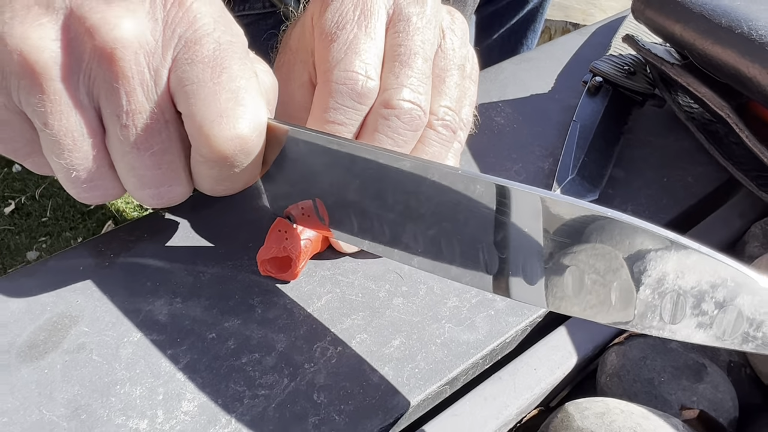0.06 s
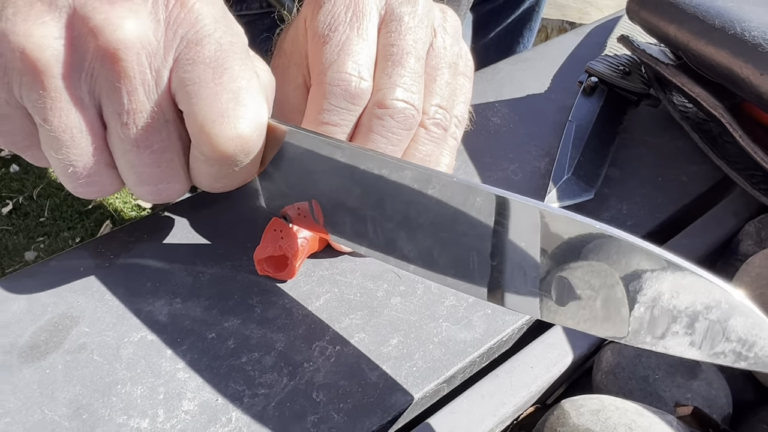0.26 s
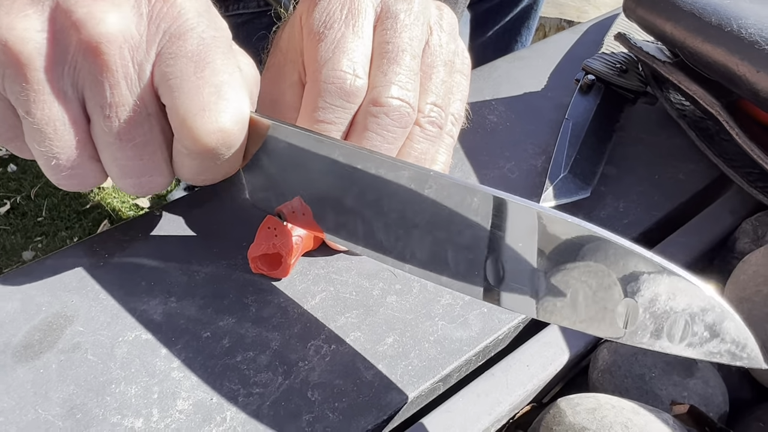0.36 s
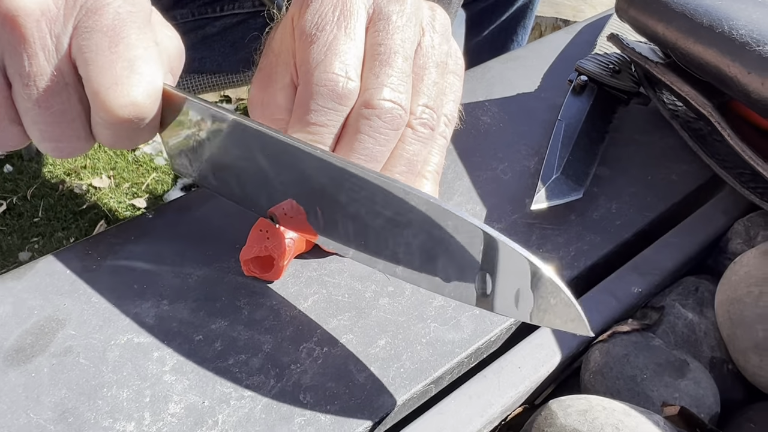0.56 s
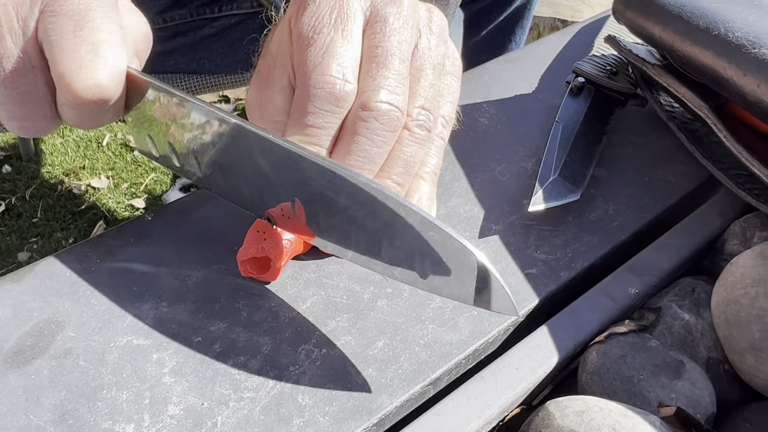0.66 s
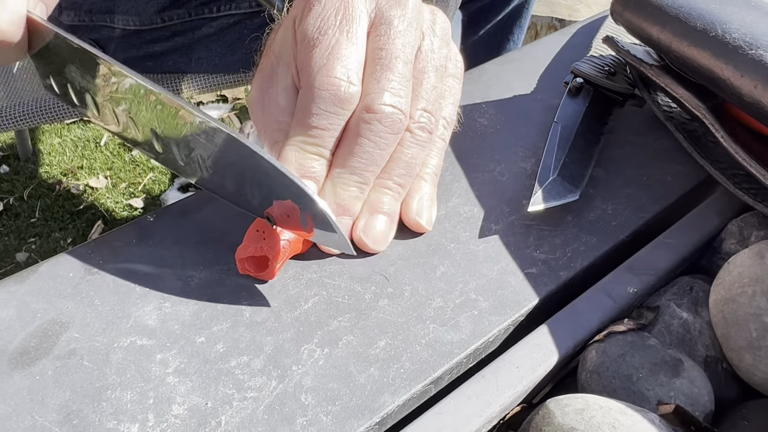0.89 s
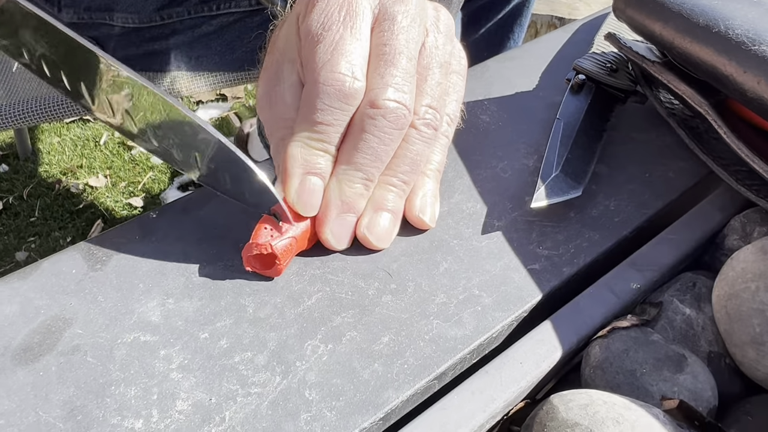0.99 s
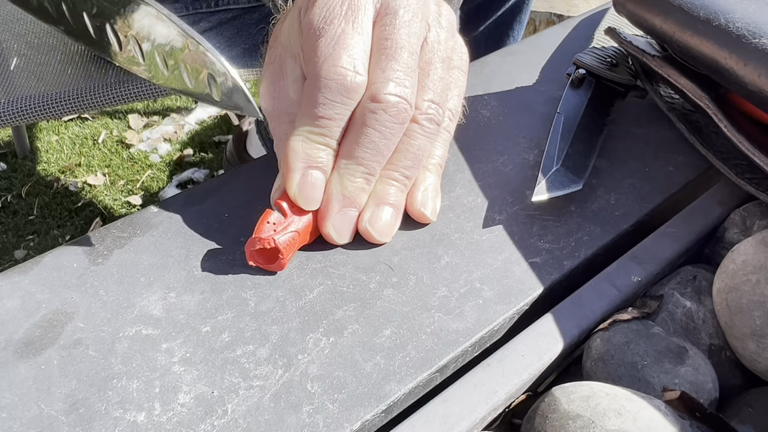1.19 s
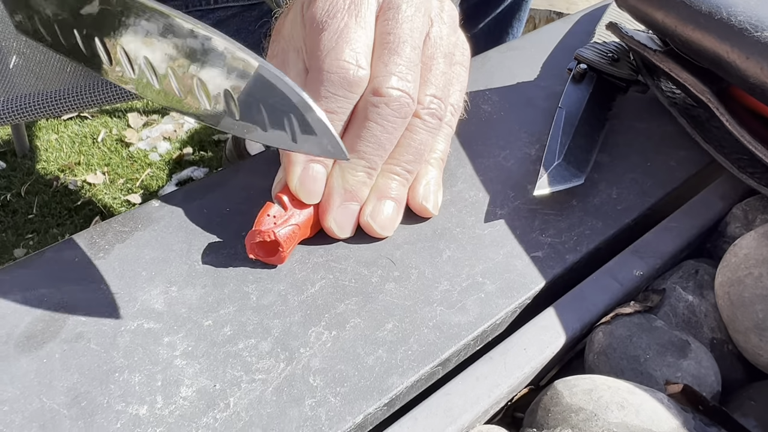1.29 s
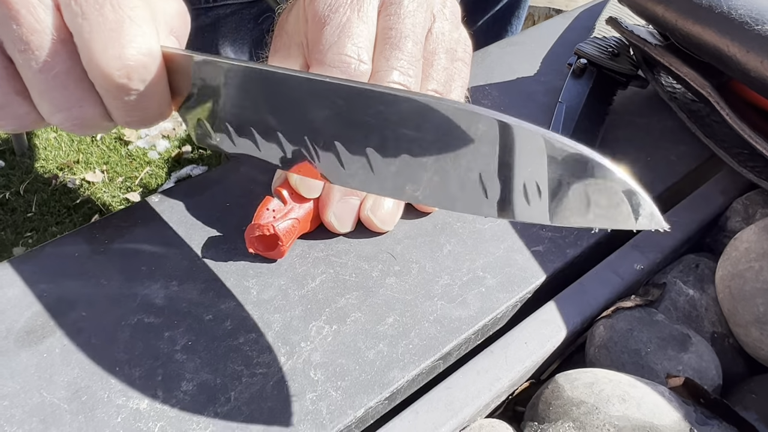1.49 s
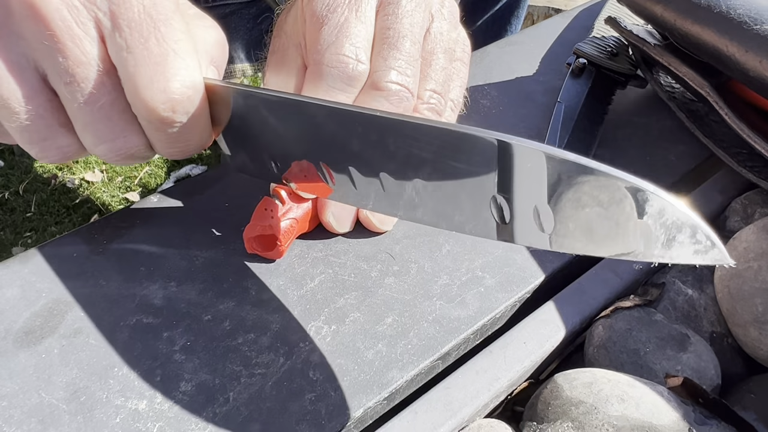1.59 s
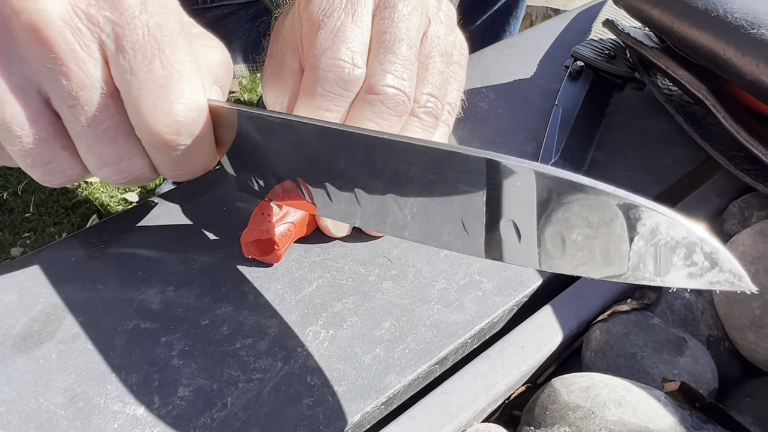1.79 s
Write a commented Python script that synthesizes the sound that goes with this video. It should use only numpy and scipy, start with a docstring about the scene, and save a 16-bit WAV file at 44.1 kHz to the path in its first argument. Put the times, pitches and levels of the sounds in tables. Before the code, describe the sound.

A knife blade rasps once through a small handheld sharpener, gritty and close, outdoors in light wind.

```python
"""Outdoors, at a plastic table: a knife is drawn once through a small carbide sharpener, close to a phone.
Random grit clicks make the rasp and ring the blade; pressure, judder and catches ring table and sharpener.
The tip slips out and rings; the blade is set back into the slot with ticks and faint thin squeaks.
Low-pitched noise buffets the microphone as wind over a faint outdoor hush."""
import sys
import numpy as np
from scipy import signal
from scipy.fft import rfft, irfft, next_fast_len
from scipy.io import wavfile
from scipy.ndimage import uniform_filter1d

SR = 44100
rng = np.random.default_rng(int(sys.argv[2]) if len(sys.argv) > 2 else 0)


def to_wav(sig):
    """Store sig (one row per channel, or 1-D mono) as 16-bit WAV at the path in sys.argv[1].

    Samples outside -1..1 are clipped; the rate is SR.
    """
    pcm = np.clip(np.atleast_2d(sig), -1, 1) * 32767
    pcm = np.round(pcm).astype(np.int16)
    wavfile.write(sys.argv[1], SR, pcm.T)  # frames by channels


def how_loud(loudness_db):
    """Turn decibels into a plain amplitude multiplier (0 dB gives 1, 20 dB gives 10)."""
    steps = np.asarray(loudness_db, float) / 20
    return 10 ** steps


N = 81585
T = np.arange(N) / SR
M = next_fast_len(N + 8192)  # padded FFT length
F = np.arange(M // 2 + 1) * SR / M

# distant noise spectrum: (frequency [Hz], relative level [dB])
HUSH_SPECTRUM = [(150, -56), (250, 0.5), (399, -10), (616, -9.5), (967, -10), (2890, -30), (11200, -36.5),
                 (15800, -38.5)]
# wind noise spectrum: (frequency [Hz], relative level [dB])
WIND_SPECTRUM = [(12, -46), (26, -25), (48, -1.5), (76, 1), (136, -6.5), (236, -15), (505, -39), (700, -80)]
# gusts on the microphone: (time [s], relative level [dB], faster eddies over the rest [dB])
GUSTS = [(0, -52, 3.5), (.105, -29.5, -20), (.2, -42, -9), (.38, -45, 2.5), (.55, -35.5, -3),
         (.592, -37.5, -5), (.628, -33.5, -15), (.66, -48, 13.5), (.85, -28.5, -10.5), (.948, -42, 5),
         (1.0, -27.5, -4), (1.118, -37, -5.5), (1.15, -33.5, -4.5), (1.195, -23.5, 4), (1.25, -32, 2),
         (1.32, -33.5, -9.5), (1.35, -23, -7.5), (1.4, -29, -14), (1.478, -45.5, 4), (1.55, -26, 5),
         (1.612, -47.5, 9.5), (1.7, -44.5, -4), (1.755, -34.5, 1), (1.79, -42, 3)]
# slide and pressure of the edge, which stutters before it runs:
# (time [s], relative rasp level [dB], relative table level [dB])
PULL_COURSE = [(.279, -77, -67.5), (.283, -55, -35), (.29, -52, -32), (.294, -85, -48), (.299, -43, -38),
               (.309, -63, -40), (.314, -45.5, -33), (.328, -61, -53), (.333, -48, -39.5),
               (.36, -50.5, -33), (.385, -41.5, -28.5), (.48, -36.5, -24.5), (.52, -39.5, -27.5),
               (.6, -37.5, -30.5), (.7, -37.5, -24), (.87, -37.5, -33), (.94, -38, -29.5), (1., -43.5, -36),
               (1.03, -45, -41), (1.04, -48, -63), (1.056, -60.5, -53), (1.12, -73, -71)]
# the edge catches and jolts the table: (time [s], relative level [dB])
EDGE_CATCHES = [(0.298, -25), (0.321, -22.5), (0.377, -16), (0.384, -21.5), (0.399, -24), (0.438, -18),
                (0.47, -23), (0.488, -19), (0.532, -13), (0.552, -9), (0.561, -9), (0.623, -22.5),
                (0.648, -23.5), (0.689, -15), (0.773, -21.5), (0.885, -19), (0.913, -11.5), (0.974, -21.5),
                (1.007, -19.5)]
# rasp spectrum: (frequency [Hz], relative level [dB])
RASP_SPECTRUM = [(600, -44), (900, -8.5), (1400, -4), (2500, -12.5), (3700, -11.5), (4500, -19.5),
                 (5400, -18.5), (6300, -23), (7400, -16.5), (9300, -22), (11400, -13), (13300, -20),
                 (14800, -20), (15500, -31)]
# table top modes: (frequency [Hz], relative level [dB], t60 [s])
TABLE_MODES = [(281.4, -13, 0.045), (353, -5.5, 0.074), (440.2, -4, 0.08), (510.3, -1, 0.057),
               (581.5, 2.5, 0.051), (670, 2.5, 0.051), (735.5, -6, 0.039)]
# plastic sharpener body, four modes below 1.5 kHz, then those above:
# (frequency [Hz], relative level [dB], t60 [s])
SHARPENER_MODES = [(905, 5.5, 0.015), (968, 2.5, 0.049), (1142, -3, 0.054), (1430, 2, 0.05),
                   (1826, -0.5, 0.041), (1967, -2.5, 0.042), (2100, -2, 0.022), (2265, -1.5, 0.047),
                   (2660, -4.5, 0.015), (3080, -14, 0.11)]
# blade resting in the slot: (frequency [Hz], relative level [dB], t60 [s])
HELD_BLADE_MODES = [(1480, -5, .06), (2616, -10, .08), (3666, -18, .07), (4355, -22, .08), (4650, -10, .04),
                    (5313, -16, .08), (5830, -6, .11), (6433, -9, .11), (7300, -7, .025), (8740, -6, .045),
                    (11240, 0, .025), (12100, 0, .035), (13510, 2, .03)]
# blade swinging free: (frequency [Hz], relative level [dB], t60 [s])
FREE_BLADE_MODES = [(5609, -4, .5), (6761, -5, .4), (7978, -10, .2), (12160, -1, .3), (12930, 2, .13),
                    (13750, 3, .25)]
# low thuds: (time [s], drive level [dB], frequency [Hz], t60 [s])
LOW_THUDS = [(0.978, -14, 77, 0.11), (1.734, -21, 74.4, 0.044)]
# blade touches the sharpener: (time [s], blade ring drive [dB], crack level [dB], crack top [Hz],
# table and sharpener drive [dB])
BLADE_TAPS = [(1.471, -63, -45, 13000, -85), (1.481, -90, -27, 5460, -52), (1.7076, -33, -30.5, 16200, -36),
              (1.7106, -44, -26.5, 17000, -62)]
# edge brushes the slot with a thin squeak:
# (start [s], length [s], mean level [dB], centre [Hz], width [Hz])
EDGE_BRUSHES = [(1.488, .04, -66, 11500, 200), (1.488, .045, -73, 8700, 300),
                (1.755, .046, -71, 13400, 350), (1.775, .035, -72, 11900, 250),
                (1.786, .014, -65, 5500, 8000)]
# near sound alike at both ports: (frequency [Hz], share [0-1])
PORT_LIKENESS = [(250, 0.7), (550, 0.99), (1200, 0.85), (2200, 0.6), (3900, 0.8), (4600, .4), (6200, .25),
                 (7300, 0.88), (8600, .6)]
# treble of the right side taken from the first port: (frequency [Hz], share [0-1])
ONE_PORT_SHARE = [(8600, 0), (9500, 0.97), (12600, 0.6), (13200, 0.99), (14000, 0.98), (15100, .4)]
# stereo phase: (frequency [Hz], lead of the right side [rad])
RIGHT_LEAD = [(0, 0), (1000, -1), (1300, -2.6), (1800, -2.2), (2200, -4.9), (3600, -4.4), (4100, -6),
              (4800, -6.9), (5900, -8.2), (7000, -6.3), (8300, -5.4), (9500, -3.3), (10500, -3.1),
              (12900, -.1), (13900, 0), (14900, 1.2), (15400, 3.1)]
# stereo balance: (frequency [Hz], left minus right [dB])
BALANCE = [(100, 0), (1800, -0.5), (4100, -1), (5500, 16), (6400, 4.5), (7200, 1.5), (8000, 4.5), (9100, 0)]

NEAR_PORT = np.array([[1], [0]])  # a ring takes one path only


def curve(rows, x, log=False, column=1):
    """Straight lines through one column of a table against its first."""
    a = np.array(rows, float)
    if log:
        return np.interp(np.log(x + 1), np.log(a[:, 0] + 1), a[:, column])
    return np.interp(x, a[:, 0], a[:, column])


def unit(x):
    """Scale to rms 1."""
    return x / np.sqrt(np.mean(x ** 2))


def shape(x, response):
    """Filter by a frequency response."""
    return irfft(rfft(x, M) * response, M)[..., :N]


def colour(x, rows):
    """Filter by a (frequency [Hz], level [dB]) spectrum."""
    return shape(x, how_loud(curve(rows, F, log=True)))


def ring(x, modes):
    """Drive decaying two-pole modes of alternating sign."""
    out = 0
    for k, (hz, db, t60_s) in enumerate(modes):
        r = np.exp(-np.log(1000) / (t60_s * SR))
        w = 2 * np.pi * hz / SR
        mode = signal.lfilter([np.sin(w)], [1, -2 * r * np.cos(w), r * r], x)
        out = out + (-1) ** k * how_loud(db) * mode
    return out


def walk(rate_hz):
    """Random level, new every 1 / rate_hz s, smoothed twice over that time."""
    k = int(SR / rate_hz)
    steps = np.repeat(rng.standard_normal(N // k + 1), k)
    return 1.09 * uniform_filter1d(uniform_filter1d(steps, k), k)[:N]


def burst(start_s, rise_s, fall_s):
    """Envelope with a quick rise and an exponential fall."""
    d = np.maximum(T - start_s, 0)
    return (1 - np.exp(-d / rise_s)) * np.exp(-d / fall_s)


def tick(time_s):
    """One unit impulse."""
    return (np.arange(N) == int(time_s * SR)) * 1.


def hush():
    """Distant outdoor noise, unrelated at the two ports, wavering slightly in level."""
    level_db = -52 + .8 * walk(6)
    return how_loud(level_db) * unit(colour(rng.standard_normal((2, N)), HUSH_SPECTRUM))


def flutter_noise():
    """Wind-coloured noise of fluttering level, rms 1."""
    flutter_db = 4.5 * walk(30.02)
    return unit(colour(rng.standard_normal(N) * how_loud(flutter_db), WIND_SPECTRUM))


def wind():
    """Low buffeting, partly shared by the ports; its faster eddies come and go."""
    alike, eddy_hz, gain_db = 0.58, 103, 1
    a, b = flutter_noise(), flutter_noise()
    both = np.array([a, alike * a + np.sqrt(1 - alike ** 2) * b])
    fast = shape(both, 1 / (1 + (eddy_hz / (F + 1)) ** 4))
    slow = both - fast
    eddies = how_loud(curve(GUSTS, T, column=2)) * fast
    return how_loud(curve(GUSTS, T) + gain_db) * (slow + eddies)


def grit():
    """Dense clicks of uneven size as carbide tears the steel, rms 1."""
    clicks_per_s, spread_db = 16000, 2.0
    hit = rng.random(N) < clicks_per_s / SR
    size = how_loud(spread_db * rng.exponential(size=N))
    return unit(hit * rng.choice([-1, 1], N) * size)


def rasp(g, slide):
    """Grit in half-octave bands whose levels flicker apart as the contact moves along the blade."""
    gain_db, flicker_db = 4, 2
    spectrum = rfft(g * slide, M) * how_loud(curve(RASP_SPECTRUM, F, log=True))
    out = 0
    for k in range(9):
        half_octaves = 2 * np.log2((F + 1) / 1000) - k
        share = np.cos(np.pi / 2 * np.clip(half_octaves, -1, 1)) ** 2
        share = np.where((F < 1000) & (k == 0), 1, share)
        out = out + how_loud(flicker_db * walk(44.1)) * irfft(spectrum * share, M)[..., :N]
    return how_loud(gain_db) * out / np.std(colour(g[0], RASP_SPECTRUM))


def pressed_blade(g, slide):
    """Grit rings the blade while it rests in the slot."""
    gain_db = -29
    return how_loud(gain_db) * ring(g * slide, HELD_BLADE_MODES) / np.std(ring(g[0], HELD_BLADE_MODES))


def body(h, force, modes):
    """Rough force on a body; the moving contact drives now one mode, now another."""
    wander_db, wander_hz = 3.5, 18
    out = 0
    for k, mode in enumerate(modes):
        drive = h * force * how_loud(wander_db * walk(wander_hz))
        out = out + (-1) ** k * ring(drive, [mode])
    return out / np.std(ring(h[0], modes))


def table(h, steady, jolts):
    """Pressure and catches shake the table top; each catch also kicks it with an impulse."""
    kick_db = -9.5
    kicks = sum(how_loud(db + kick_db) * tick(s) for s, db in EDGE_CATCHES)
    return body(h, steady + jolts, TABLE_MODES) + ring(kicks, TABLE_MODES)


def sharpener(h, slide, steady, jolts):
    """Plastic body rattles, more near the tip in its low modes; the skidding point buzzes it."""
    gain_db, catch_db = -9.5, 0.5
    tip_db = 8.5 * np.clip((T - 0.861) / 0.052, 0, 1)
    low = body(h, (steady + jolts) * how_loud(tip_db), SHARPENER_MODES[:4])
    high = body(h, steady + how_loud(catch_db) * jolts, SHARPENER_MODES[4:])
    skid = how_loud(6) * np.clip((T - .98) / 0.024, 0, 1)
    buzz = body(h, slide * skid, SHARPENER_MODES[2:5])
    return how_loud(gain_db) * (low + high) + buzz


def pull():
    """Slide drives rasp and blade; separate grit, pressure, judder and catches shake the bodies."""
    judder_db, judder_hz = 3, 65
    catch_db, catch_rise_s, catch_fall_s = -8.5, 0.00044, 0.0063
    on = (T > PULL_COURSE[0][0]) * (T < PULL_COURSE[-1][0])
    slide = how_loud(curve(PULL_COURSE, T)) * on
    press = how_loud(curve(PULL_COURSE, T, column=2)) * on
    steady = how_loud(judder_db * walk(judder_hz)) * press
    jolts = sum(how_loud(db + catch_db) * burst(s, catch_rise_s, catch_fall_s) for s, db in EDGE_CATCHES)
    g = np.array([grit(), grit()])
    h = np.array([grit(), grit()])
    edge = rasp(g, slide) + pressed_blade(g, slide)
    return edge + table(h, steady, jolts) + sharpener(h, slide, steady, jolts)


def thuds():
    """Soft pushes that ring a low, damped mode."""
    out = 0
    for s, db, hz, t60_s in LOW_THUDS:
        out = out + uniform_filter1d(ring(tick(s), [(hz, db, t60_s)]), size=120)
    return out


def tip_release():
    """The tip slips out: one impulse rings the free blade."""
    time_s, drive_db = 1.04, -53.5
    return how_loud(drive_db) * NEAR_PORT * ring(tick(time_s), FREE_BLADE_MODES)


def touches():
    """Short knocks: a noise crack, the held blade, and a push into sharpener and table."""
    out, noise = 0, rng.standard_normal((2, N))
    for s, blade_db, crack_db, top_hz, table_db in BLADE_TAPS:
        crack_band = (F > 800) / (1 + (F / top_hz) ** 6)
        crack = shape(noise * burst(s, 0.00013, .0008), crack_band)
        blade = NEAR_PORT * ring(tick(s), HELD_BLADE_MODES)
        push = uniform_filter1d(ring(tick(s), TABLE_MODES + SHARPENER_MODES), size=20)
        out = out + how_loud(crack_db) * crack + how_loud(blade_db) * blade + how_loud(table_db) * push
    return out


def brushes():
    """Faint band-limited hisses of wavering level that swell and stop."""
    out = 0
    for s, length_s, db, hz, width_hz in EDGE_BRUSHES:
        band = np.exp(-((F - hz) / width_hz) ** 2 * 2)
        hiss = unit(shape(rng.standard_normal(N), band))
        swell = np.sin(np.pi * np.clip((T - s) / length_s, 0, 1)) ** 0.092
        out = out + how_loud(db + 6.2 * walk(58)) * hiss * swell
    return out


def ports(x):
    """Near sound at two ports: the second hears a share of it by another path."""
    c = np.clip(curve(PORT_LIKENESS, F, log=True), 0, 1)
    second = shape(x[0], c) + shape(x[1], np.sqrt(1 - c * c))
    return np.array([x[0], second])


def scene():
    """All sources at the two microphone ports."""
    near = pull() + tip_release() + touches() + brushes()
    return hush() + wind() + ports(near) + thuds()


def band_limit(x):
    """A steep low-pass at the top of the band."""
    return signal.sosfilt(signal.butter(12, 16610, fs=SR, output="sos"), x)


def record(dry):
    """Phone: right treble drawn largely from one port, right phase turned, balance tilted, top cut."""
    top_hz = 15750
    one = np.clip(curve(ONE_PORT_SHARE, F), 0, 1)
    right = shape(dry[0], one) + shape(dry[1], np.sqrt(1 - one ** 2))
    tilt_db = curve(BALANCE, F)
    turn = np.exp(1j * curve(RIGHT_LEAD, F))
    stereo = np.array([shape(dry[0], how_loud(tilt_db / 2)), shape(right, how_loud(-tilt_db / 2) * turn)])
    return band_limit(shape(stereo, 1 / (1 + (F / top_hz) ** 80)))


dry = scene()
out = record(dry)
to_wav(out)
```